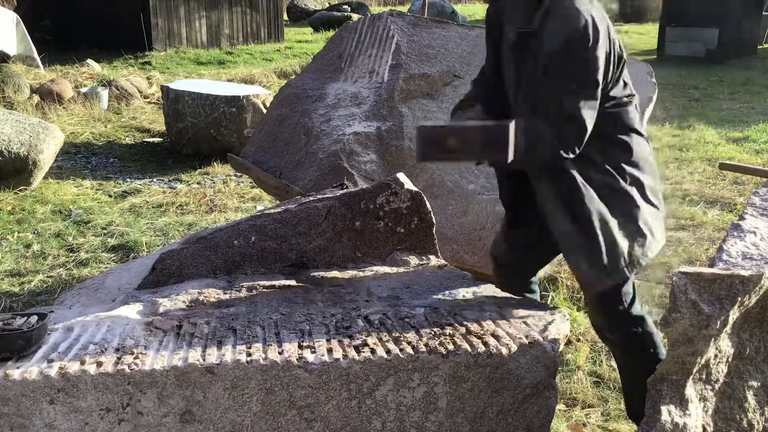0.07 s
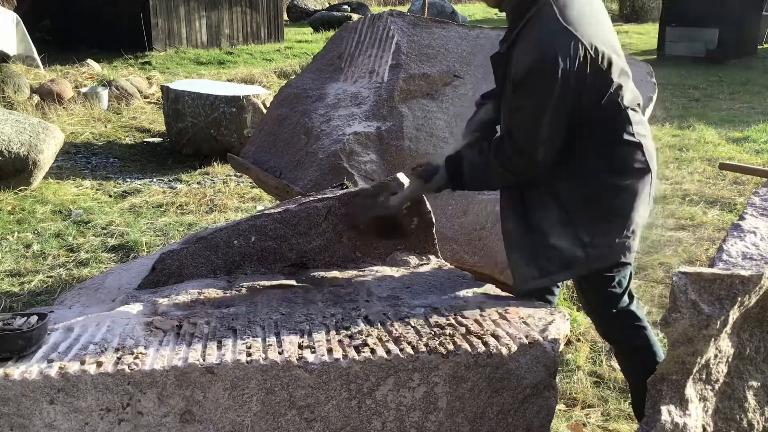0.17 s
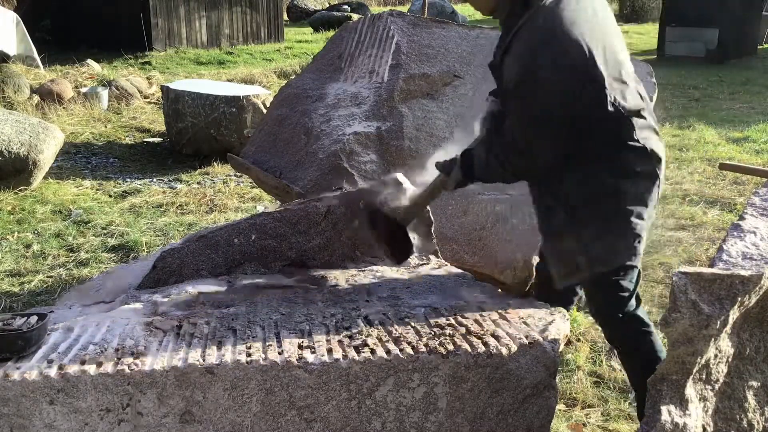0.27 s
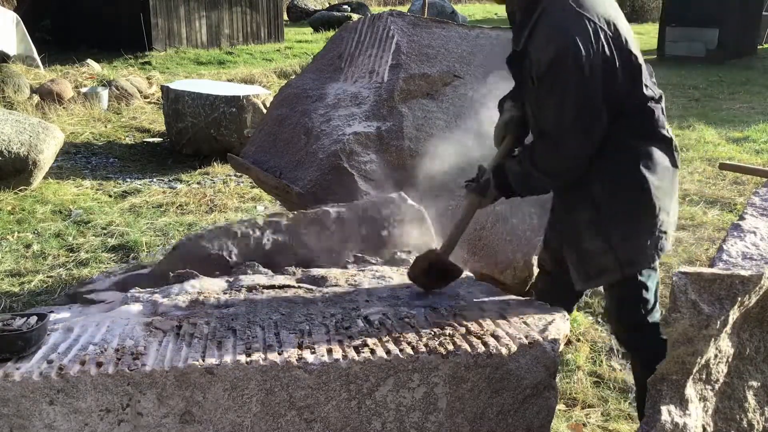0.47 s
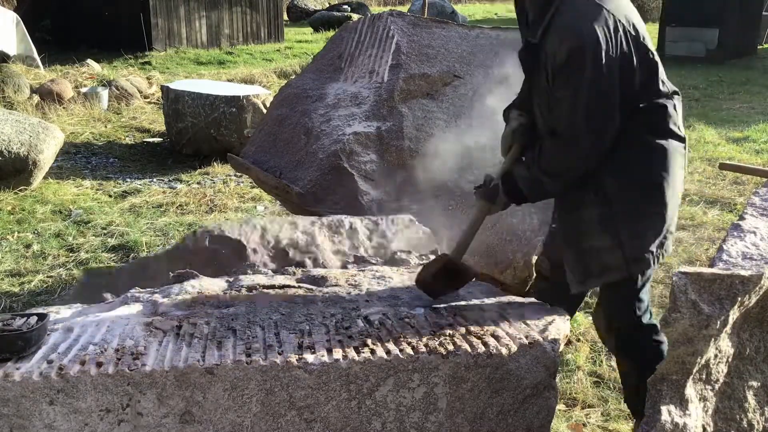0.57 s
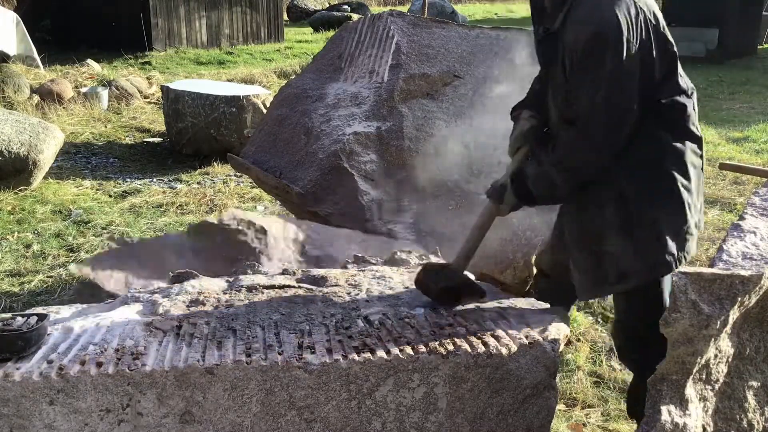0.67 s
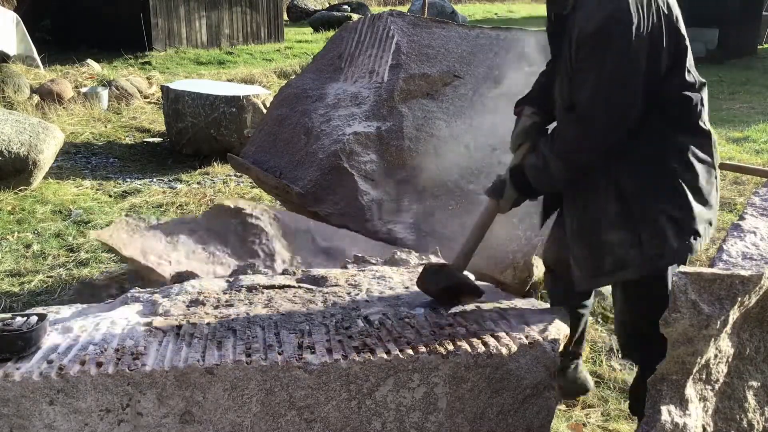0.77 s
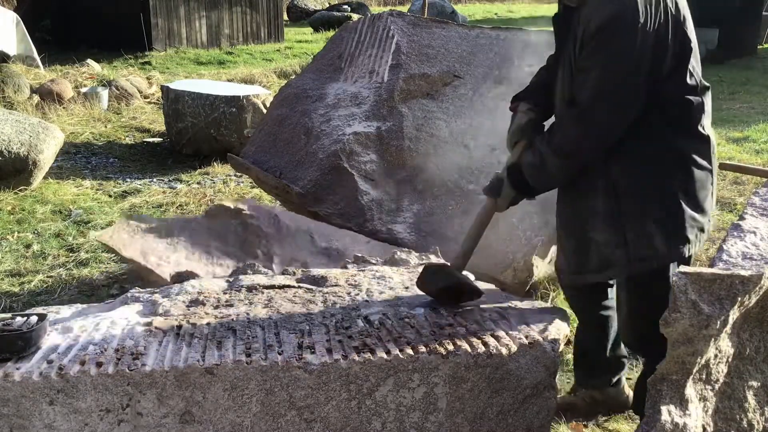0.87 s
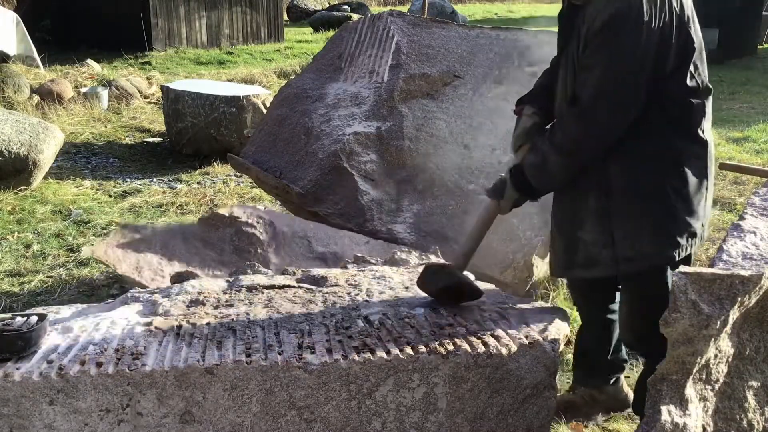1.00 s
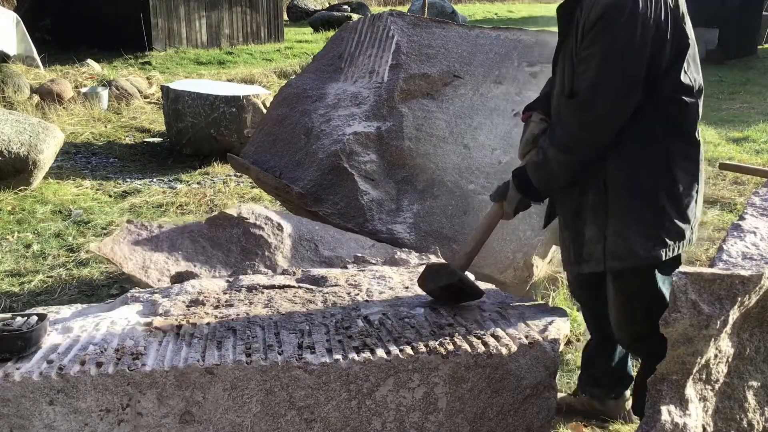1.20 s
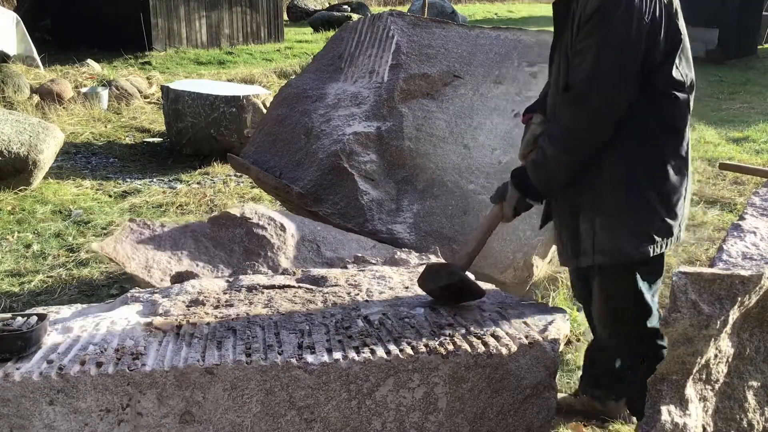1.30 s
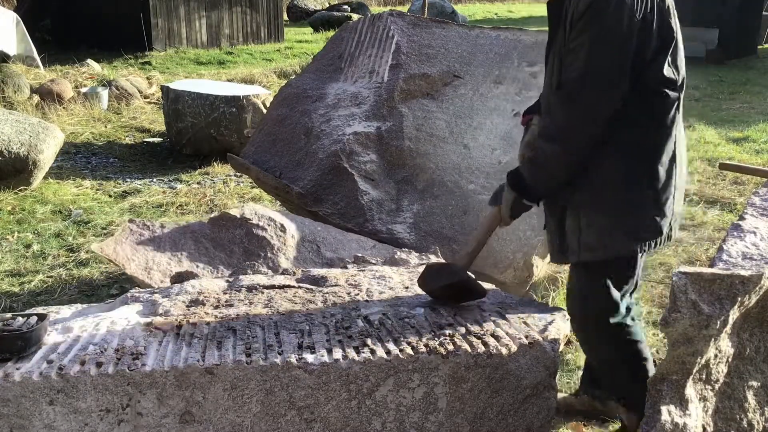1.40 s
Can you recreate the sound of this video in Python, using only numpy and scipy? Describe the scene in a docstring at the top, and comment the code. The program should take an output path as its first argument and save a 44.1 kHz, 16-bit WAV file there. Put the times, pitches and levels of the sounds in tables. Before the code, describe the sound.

Close view outdoors: after a brief quiet, a heavy hammer splits stone with a short hard smack, then loose rubble rattles, a chunk lands with dull thuds, and faint settling fades into a low background.

```python
"""Outdoors, in quiet country: a sledgehammer splits a stone slab.
Blow: ringing modes of slab and steel head, a bright snap, fracture noise dying band by band.
The broken piece topples and thuds down in a few bounces: dying low swings of sagging pitch.
Chips clatter as short noise and tones; grit trickles as ringing grains over dust noise.
Dull echoes follow; a steady bed of shaped noise lies below."""
import sys
import numpy as np
from scipy import signal
from scipy.io import wavfile

SR = 44100
rng = np.random.default_rng(int(sys.argv[2]) if len(sys.argv) > 2 else 0)


def transcribe(u):
    """Save the signal u as a 16-bit wav file named by the first command-line argument.

    u: samples, shape (n,) or (channels, n), limited to [-1, 1]; the rate is SR.
    q: integer samples, one column per channel.
    """
    v = np.clip(np.atleast_2d(u).T, -1, 1)
    q = np.round(v * 32767).astype(np.int16)
    wavfile.write(sys.argv[1], SR, q)


def makeup_ratio(level_db):
    """Linear amplitude ratio for a level in decibels (20 dB per factor of ten)."""
    decades = np.asarray(level_db, float) / 20
    return 10 ** decades


N = 63945

# outdoor background spectrum, shape only: [freq_hz, density_db_per_hz]
AIR_SPECTRUM = [(25, -36.5), (55, -0.5), (110, 0), (250, -15), (500, -14.5), (1000, -31), (2000, -36),
                (6000, -38), (9000, -37), (16500, -42)]
# grit and dust spectrum, shape only: [freq_hz, density_db_per_hz]
GRIT_SPECTRUM = [(40, -24.5), (90, 2), (350, -2.5), (700, -7), (1200, -9.5), (2300, -15.5), (4000, -24.5),
                 (8000, -30.5), (16000, -31.5)]
# rubble and grit on the move: [time_s, level_db, bass_over_level_db, treble_over_level_db]
RUBBLE_COURSE = [(0.198, -69, -5.5, -12), (0.238, -26, 10, 4), (0.291, -46, -14, -2), (.35, -49, -17, -14),
                 (.39, -48.5, -14, -1.5), (.44, -48.5, -6, -1), (0.502, -45, -4.5, 0), (.6, -50, -9, -7.5),
                 (0.658, -60.5, -24, 1), (.7, -52.5, 1, 3.5), (.8, -59.5, 3, 0.5), (0.919, -66, 5.5, 2.5),
                 (1.0, -66, -4, -4), (1.09, -65, -3.5, -6), (1.2, -67, 4, -3.5), (1.3, -69, 1, -7),
                 (1.45, -77, 2, 3)]
# chips clacking on stone: [start_s, level_db, centre_hz, t60_s, width_share_of_centre]
CHIP_CLACKS = [(0.208, -32.5, 1150, 0.017, 0.6), (0.2317, -18.5, 2630, 0.049, 1),
               (0.2625, -18.5, 2800, 0.013, 0.18), (0.264, -24, 1300, 0.013, 0.37),
               (0.2622, -36, 6460, 0.011, .2), (0.296, -40, 3670, 0.01, 0.11),
               (.301, -31.5, 2103, 0.06, 0.15), (0.3232, -25, 1460, 0.012, 0.083),
               (.3237, -29.5, 2450, 0.0071, 0.16), (.326, -35.5, 1450, 0.11, 0.31),
               (.371, -50, 6500, 0.0068, 0.26), (.387, -52, 9000, 0.008, 0.65),
               (.394, -50, 12300, 0.015, 0.1), (.415, -50, 10000, .01, 0.55),
               (.468, -51.5, 5330, .05, 0.037), (0.479, -44.5, 1622, 0.23, 0.044),
               (0.495, -44.5, 5180, 0.033, 0.069), (0.51, -38, 5220, 0.014, 0.036),
               (0.527, -37, 2190, 0.022, 0.3), (.5525, -22.5, 766, 0.044, 0.26),
               (.5525, -29, 1150, 0.043, 0.49), (0.555, -36.5, 4000, 0.026, 0.2),
               (0.5883, -33.5, 4850, 0.016, 1), (0.591, -32, 1300, 0.095, 0.98),
               (0.5976, -26.5, 2104, 0.021, 0.068), (0.598, -28, 5370, 0.011, 0.13),
               (.607, -46, 1940, 0.022, .15), (0.615, -43.5, 4240, 0.027, 0.049),
               (0.614, -42.5, 6840, 0.045, 0.48), (.6805, -39, 1010, 0.027, 0.26),
               (0.68, -43, 3500, 0.028, 0.31), (0.692, -52, 3060, .04, 0.13),
               (.712, -29.5, 530, 0.062, 0.076), (.712, -49, 850, 0.033, 0.078),
               (.712, -30, 1041, 0.044, 0.02), (.7125, -44, 1620, 0.065, 0.16),
               (0.7115, -53, 4240, 0.017, 0.13), (0.7273, -39.5, 3500, 0.028, 0.27),
               (0.769, -37.5, 3000, 0.03, 0.23), (.767, -41, 980, 0.028, 0.19),
               (.767, -36, 2010, 0.023, .25), (0.766, -49, 4430, 0.011, 0.093),
               (0.786, -52, 4740, .03, 0.073), (0.822, -41, 1600, 0.087, 0.014),
               (.821, -41, 2100, 0.047, 0.034), (0.821, -49, 5250, 0.044, 1)]
# low thuds of sagging pitch, a faint low rumble just before the blow first:
# [start_s, level_db, first_pitch_hz, pitch_halved_after_s, t60_s]
LOW_THUDS = [(0.218, -21.5, 300, 0.073, 0.082), (0.2351, 0, 224.5, 0.0056, 0.05),
             (0.262, -28.5, 338, 0.0081, 0.021), (.325, -39.5, 326, 0.037, 0.079),
             (.394, -22.5, 710, 0.032, 0.011), (0.429, -35, 800, 0.09, 0.018),
             (0.458, -37, 207, 0.013, 0.072), (.478, -32.5, 320, 0.013, 0.056),
             (0.495, -27.5, 413, .03, 0.02), (.513, -25.5, 327, 0.036, 0.028),
             (0.526, -49, 406, 0.038, 0.02), (0.5529, -19, 404, 0.0045, .04),
             (0.594, -31.5, 357, 0.025, 0.033), (0.7119, -11.5, 300, 0.044, 0.036),
             (.716, -26.5, 170, 0.032, 0.053), (0.728, -31.5, 187.3, .012, 0.067),
             (0.734, -42, 70, 0.06, 0.11), (0.766, -39, 87.8, 0.04, 0.13),
             (0.8241, -22.5, 264, 0.013, 0.081), (.863, -36, 267, 0.0568, 0.075),
             (0.889, -40, 198.2, 0.042, 0.063), (0.908, -34, 192.2, 0.04, 0.038),
             (0.928, -37, 266.8, 0.047, 0.031), (0.95, -44, 154, 0.04, 0.056),
             (1.153, -49.5, 300, 0.044, 0.067), (1.174, -50.5, 192, 0.039, 0.085),
             (1.197, -47, 354.3, 0.032, 0.034), (1.225, -48.5, 300, 0.053, 0.072),
             (1.25, -51, 147.9, 0.035, 0.055)]
# slab modes: [freq_hz, level_over_blow_db, t60_s, face_to_microphone_sign]
SLAB_MODES = [(345, -3.5, 0.051, 1), (605, -6, 0.04, 1), (703, -14, 0.096, -1), (786.5, -9, .055, 1),
              (977, -17, 0.034, 1), (1133, 1.5, 0.04, 1), (1555, -7.5, 0.029, -1), (1772, 0, 0.015, -1),
              (1995, -11.5, 0.027, 1), (2288, -11.5, 0.046, 1), (3102, -26, 0.013, -1),
              (3476, -16.5, 0.025, 1)]
# steel head modes: [freq_hz, level_db, t60_s]
HEAD_MODES = [(6686, -51, .33), (10880, -41, .11), (12310, -54, .22)]
# fracture noise by band: [freq_hz, level_db, t60_s]
CRACK_BANDS = [(60, -39, 0.0783), (300, -27, 0.061), (800, -13, 0.044), (1760, -21, 0.024),
               (4000, -32.5, .06), (6000, -43, 0.062), (9000, -52, .09), (14000, -53, .09)]

AIR_DB = -65.5
ECHO_DB, ECHO_T60_S, ECHO_CUT_HZ, ECHO_GAP_S = -31.5, 0.47, 7500, .008
GRAINS_PER_S, GRAIN_SPREAD_DB, GRAIN_T60_CYCLES, DUST_DB = 2400, 3, 4.1, -4.5
BASS_HZ, TREBLE_HZ = 500, 3500
CLICK_RISE_S = .00025  # chips and snap
CHIP_SKIRT_DB = -23.5
CHIP_TONE_WIDTH = .12  # narrower clacks ring as a clear tone
THUD_RISE_S, THUD_PUFF_DB, THUD_PUFF_HZ = .002, -17.5, 800
BLOW_S, BLOW_DB, CONTACT_HZ = .2323, -3.5, 3500
HEAD_WAVER_DB = 2  # rms
SNAP_DB, SNAP_T60_S = -10.5, 0.0042
MIC_LOW_HZ, TOP_HZ = 39.7, 16600


def rms_one(x):
    """Scale to unit rms."""
    return x / np.sqrt(np.mean(x ** 2) + 1e-20)


def at_hz(points, hz, column=1):
    """Read a table column at hz, on a log frequency axis."""
    table = np.array(points)
    return np.interp(np.log(hz), np.log(table[:, 0]), table[:, column])


def since(start_s):
    """Seconds since start_s, zero before it, and a gate that opens there."""
    t = np.arange(N) / SR - start_s
    return np.maximum(t, 0), t >= 0


def ring(x, hz, t60_s):
    """Two-pole resonator: a unit click rings a dying sine of height 1."""
    radius, angle = makeup_ratio(-60 / (t60_s * SR)), 2 * np.pi * hz / SR
    poles = [1, -2 * radius * np.cos(angle), radius * radius]
    return signal.lfilter([0, np.sin(angle)], poles, x + 1e-18)


def low(x, cut_hz, order):
    """Butterworth low-pass."""
    return signal.sosfilt(signal.butter(order, cut_hz, fs=SR, output="sos"), x)


def band(x, low_hz, high_hz, order=2):
    """Butterworth band-pass, edges kept in range."""
    edges_hz = [max(low_hz, 10), min(high_hz, SR / 2.1)]
    return signal.sosfilt(signal.butter(order, edges_hz, "band", fs=SR, output="sos"), x)


def noise_bands():
    """Half-octave noise bands with their centres; neighbours use separate noise."""
    edges_hz = 30 * 2 ** np.arange(0, 9.6, .5)
    white = rng.standard_normal((2, N))
    return [(np.sqrt(lo * hi), band(white[k % 2], lo, hi))
            for k, (lo, hi) in enumerate(zip(edges_hz, edges_hz[1:]))]


def shaped_noise(spectrum):
    """Steady noise weighted band by band to a spectrum, at unit rms."""
    return rms_one(sum(makeup_ratio(at_hz(spectrum, hz)) * noise for hz, noise in noise_bands()))


def air():
    """Steady outdoor background: shaped noise."""
    return makeup_ratio(AIR_DB) * shaped_noise(AIR_SPECTRUM)


def yard(x):
    """Scattered dull echoes from boulders and fences: convolution with dying noise."""
    t = np.arange(SR // 2) / SR
    echoes = rng.standard_normal(len(t)) * makeup_ratio(-60 * t / ECHO_T60_S) * (t > ECHO_GAP_S)
    echoes = low(echoes, ECHO_CUT_HZ, 1)
    unit_energy = echoes / np.sqrt(np.sum(echoes ** 2))
    return makeup_ratio(ECHO_DB) * signal.fftconvolve(x, unit_energy)[:N]


def rubble():
    """Random grains of uneven size ring a few cycles at spread pitches, on a wash of dust."""
    pitches_hz = np.geomspace(100, 15000, num=30)
    sizes = makeup_ratio(GRAIN_SPREAD_DB * np.minimum(rng.exponential(1, N), 5)) * rng.choice([-1, 1], N)
    hits = sizes * (rng.random(N) < GRAINS_PER_S / SR)
    pitch_index = rng.integers(0, len(pitches_hz), N)
    grains = 0
    for k, hz in enumerate(pitches_hz):
        ringing = ring(hits * (pitch_index == k), hz, GRAIN_T60_CYCLES / hz)
        ringing = rms_one(band(ringing, hz / 2, hz * 1.33))
        grains = grains + makeup_ratio(at_hz(GRIT_SPECTRUM, hz)) * np.sqrt(hz) * ringing  # bandwidth grows with hz
    mix = rms_one(grains) + makeup_ratio(DUST_DB) * shaped_noise(GRIT_SPECTRUM)

    time_s, *columns = np.transpose(RUBBLE_COURSE)
    level, bass, treble = (makeup_ratio(np.interp(np.arange(N) / SR, time_s, c)) for c in columns)
    bass_change = (bass - 1) * band(mix, 52, BASS_HZ, order=1)
    treble_change = (treble - 1) * band(mix, TREBLE_HZ, SR, order=1)
    return level * (mix + bass_change + treble_change)


def chips():
    """Each clack: dying noise round a centre, a tone if narrow, and a broader click."""
    out, white = 0, rng.standard_normal((2, N))
    for start_s, level_db, hz, t60_s, width in CHIP_CLACKS:
        t, _ = since(start_s)
        core = rms_one(band(white[0], hz / (1 + width), hz * (1 + width)))
        skirt = rms_one(band(white[1], hz / 3, hz * 3, order=1))
        tone = np.sin(2 * np.pi * hz * t) * np.exp(-width / CHIP_TONE_WIDTH)
        shape = (1 - np.exp(-t / CLICK_RISE_S)) * makeup_ratio(level_db - 60 * t / t60_s)
        out = out + shape * (core / 2 + tone + makeup_ratio(CHIP_SKIRT_DB) * skirt)
    return out


def thuds():
    """Each thud: a dying low swing whose pitch sags, with a dull puff of noise."""
    out, puff = 0, rms_one(band(rng.standard_normal(N), 100, THUD_PUFF_HZ))
    for start_s, level_db, hz, halved_s, t60_s in LOW_THUDS:
        t, _ = since(start_s)
        turns = hz * halved_s * np.log1p(t / halved_s)  # pitch = hz / (1 + t / halved_s)
        shape = (1 - np.exp(-t / THUD_RISE_S)) * makeup_ratio(level_db - 60 * t / t60_s)
        out = out + shape * (np.sin(2 * np.pi * turns) + makeup_ratio(THUD_PUFF_DB) * puff)
    return out


def blow():
    """One hard contact rings slab and head; a snap, then fracture noise dying band by band."""
    t, gate = since(BLOW_S)
    click = np.zeros(N)
    click[int(BLOW_S * SR)] = 1
    contact = low(click, CONTACT_HZ, 2)
    slab = sum(np.sign(face) * makeup_ratio(BLOW_DB + level_db) * ring(contact, hz, t60_s)
               for hz, level_db, t60_s, face in SLAB_MODES)

    waver = makeup_ratio(HEAD_WAVER_DB * rms_one(band(rng.standard_normal(N), 15, 66)))
    head = waver * sum(makeup_ratio(level_db) * ring(click, hz, t60_s) for hz, level_db, t60_s in HEAD_MODES)

    snap_shape = (1 - np.exp(-t / CLICK_RISE_S)) * makeup_ratio(SNAP_DB - 60 * t / SNAP_T60_S)
    snap = snap_shape * rms_one(band(rng.standard_normal(N), 2000, 4400))

    crack = 0
    for hz, noise in noise_bands():
        decay_db = 60 * t / at_hz(CRACK_BANDS, hz, column=2)
        crack = crack + gate * rms_one(noise) * makeup_ratio(at_hz(CRACK_BANDS, hz) - decay_db)
    return slab + head + snap + crack


def scene():
    """Stone sounds and their echoes, rubble, background; mono."""
    stone = blow() + thuds() + chips()
    return (stone + yard(stone) + rubble() + air())[None]


def roll_off(x):
    """The treble ends steeply here."""
    return signal.sosfilt(signal.butter(12, 16650, fs=SR, output="sos"), x)


def record(dry):
    """The microphone drops the deep bass, peaks are rounded, the top is cut."""
    mic = signal.sosfilt(signal.butter(3, MIC_LOW_HZ, "high", fs=SR, output="sos"), dry)
    rounded = np.tanh(mic)
    finished = signal.sosfilt(signal.cheby2(12, 60, TOP_HZ, fs=SR, output="sos"), rounded)
    return roll_off(finished)


dry = scene()
out = record(dry)
transcribe(out)
```